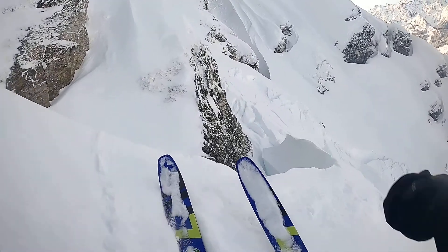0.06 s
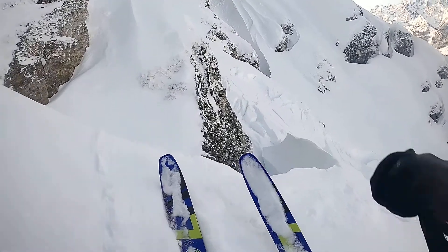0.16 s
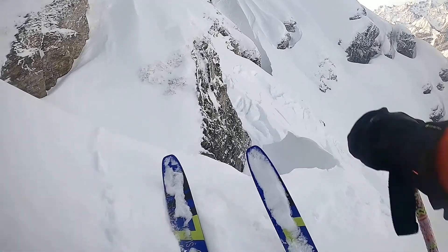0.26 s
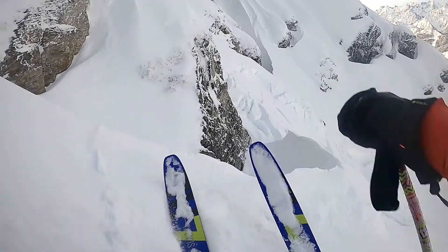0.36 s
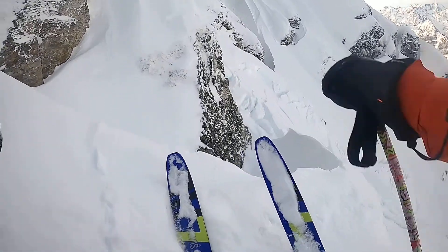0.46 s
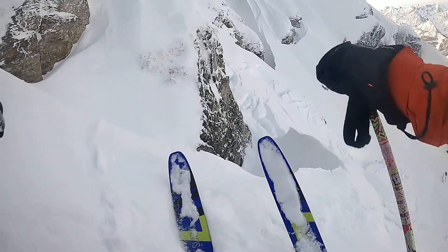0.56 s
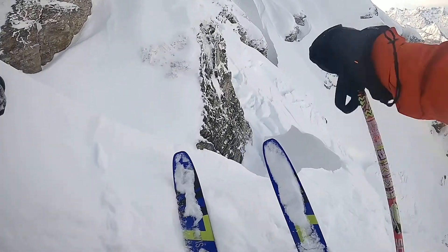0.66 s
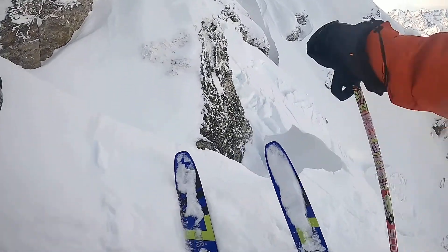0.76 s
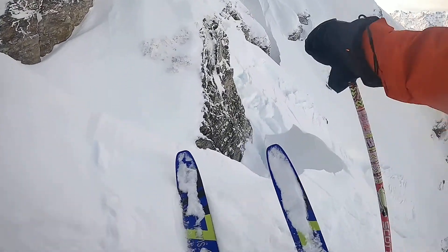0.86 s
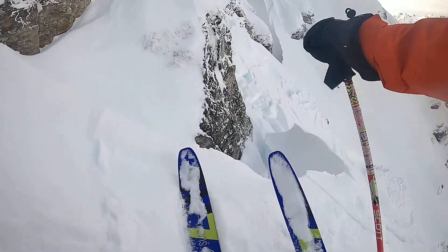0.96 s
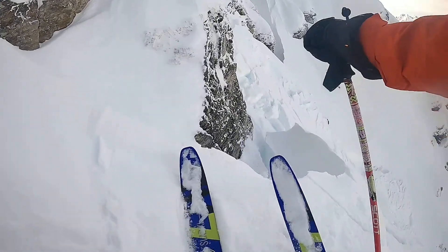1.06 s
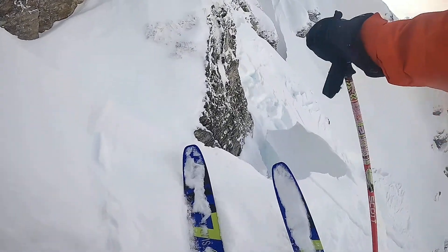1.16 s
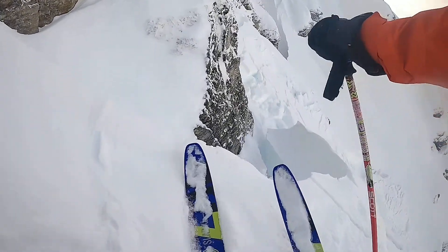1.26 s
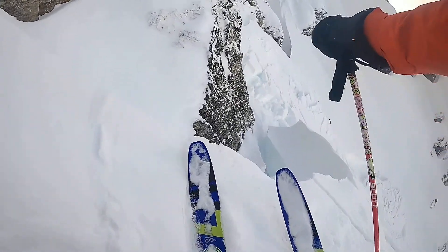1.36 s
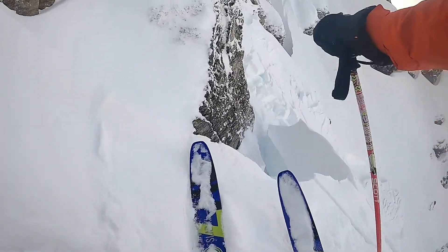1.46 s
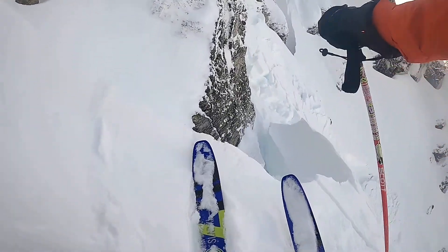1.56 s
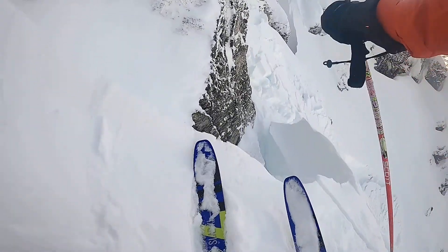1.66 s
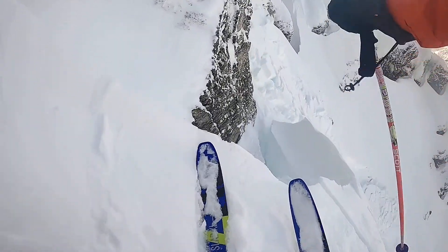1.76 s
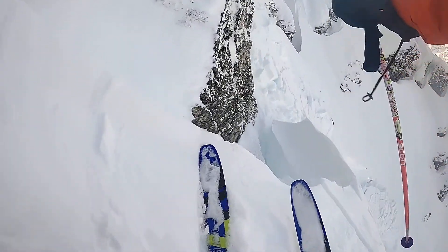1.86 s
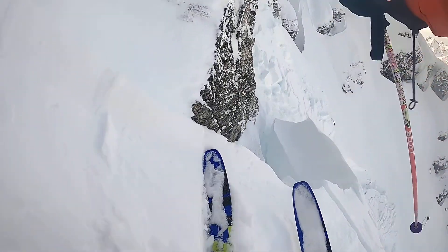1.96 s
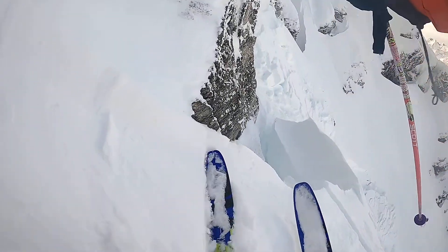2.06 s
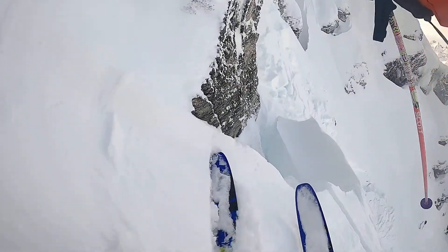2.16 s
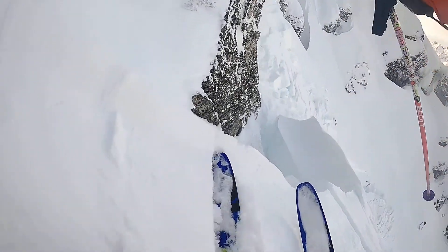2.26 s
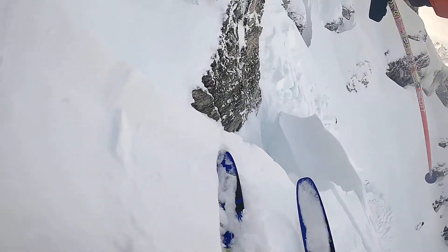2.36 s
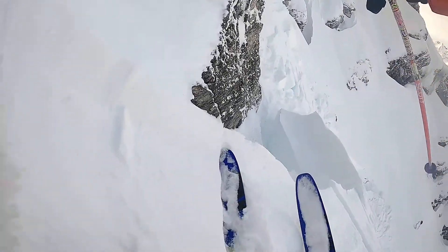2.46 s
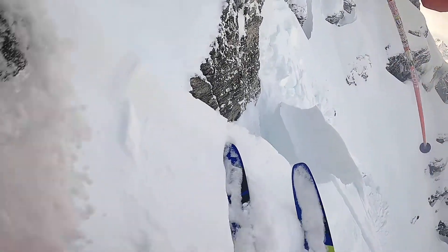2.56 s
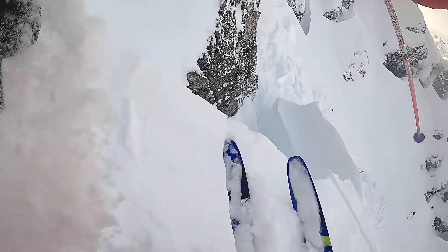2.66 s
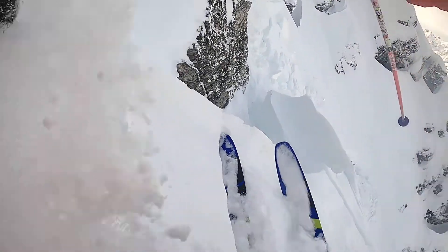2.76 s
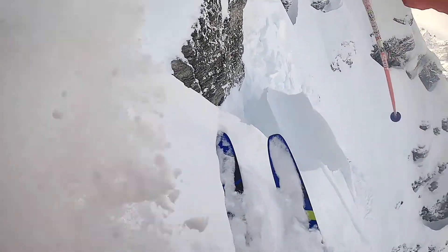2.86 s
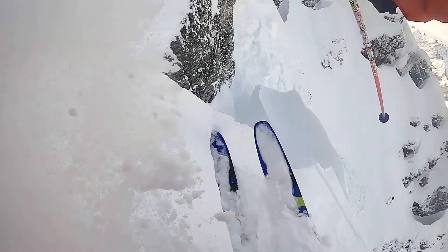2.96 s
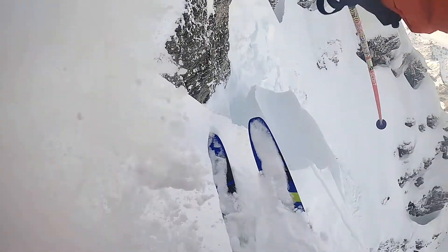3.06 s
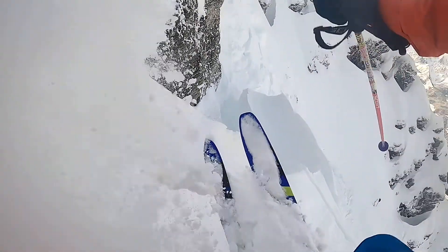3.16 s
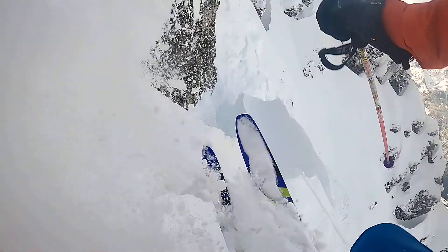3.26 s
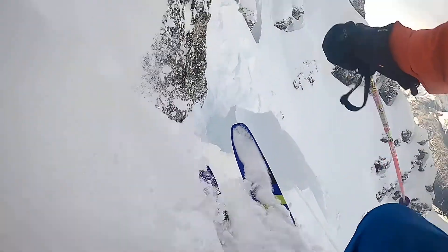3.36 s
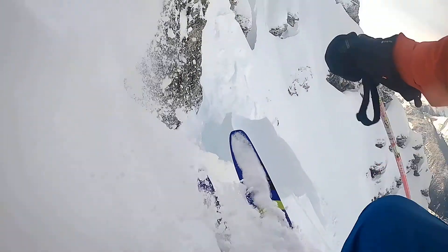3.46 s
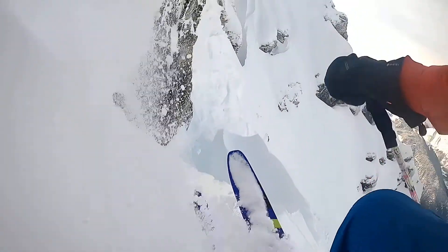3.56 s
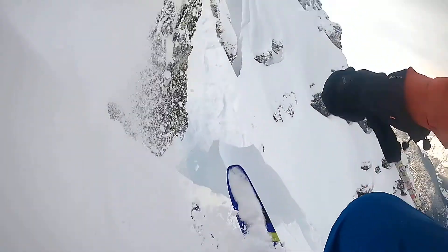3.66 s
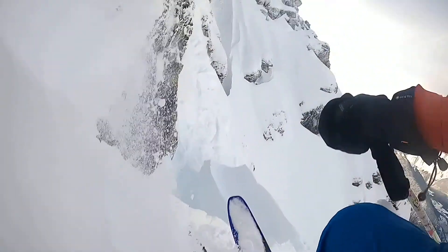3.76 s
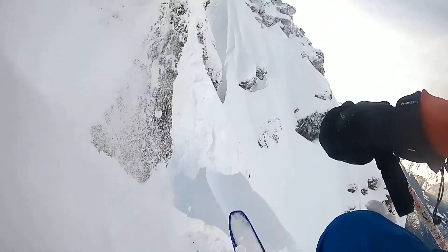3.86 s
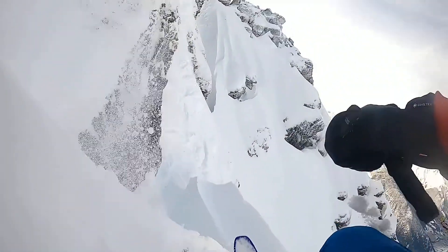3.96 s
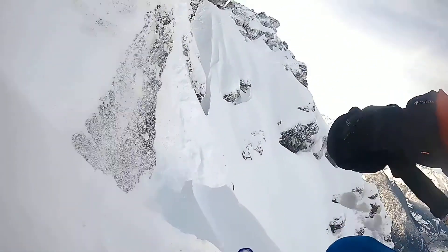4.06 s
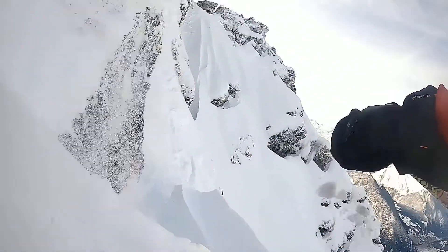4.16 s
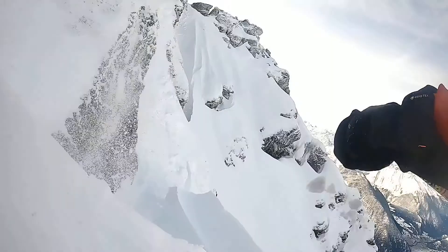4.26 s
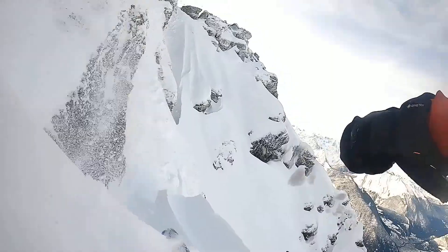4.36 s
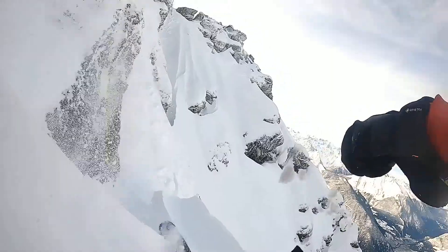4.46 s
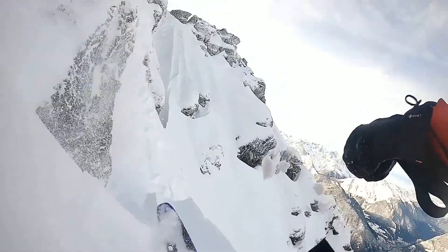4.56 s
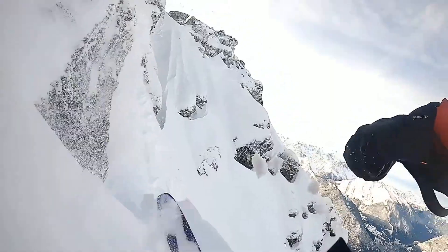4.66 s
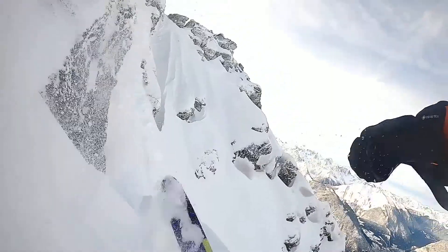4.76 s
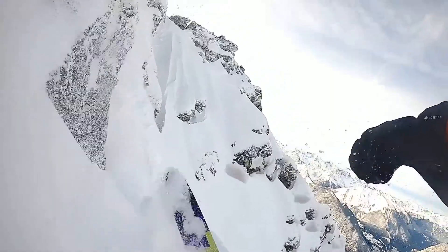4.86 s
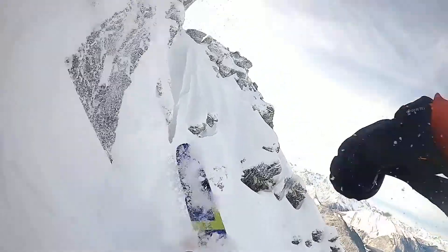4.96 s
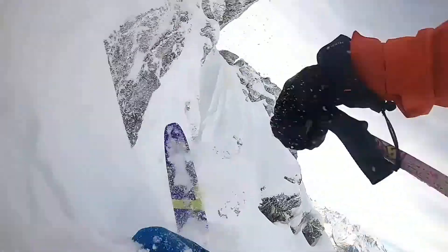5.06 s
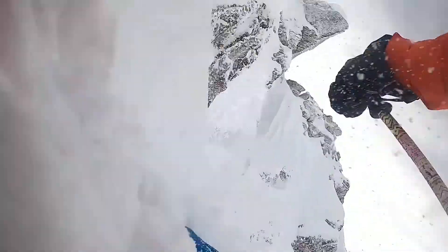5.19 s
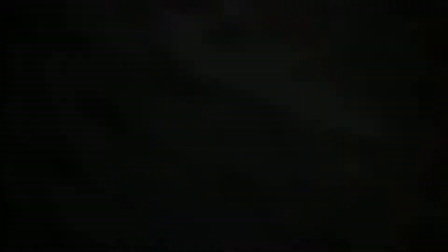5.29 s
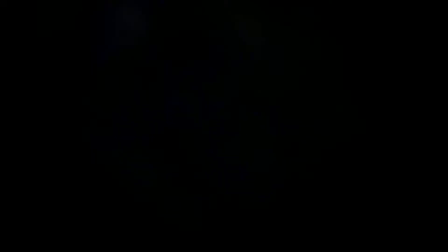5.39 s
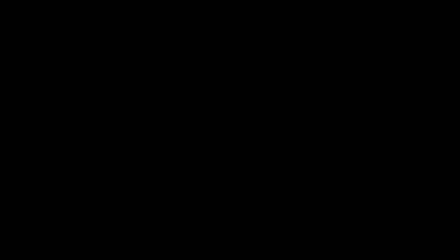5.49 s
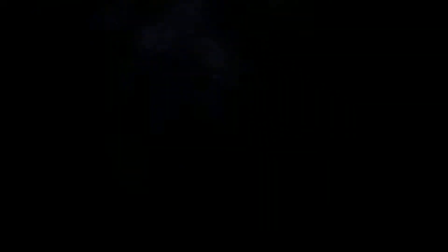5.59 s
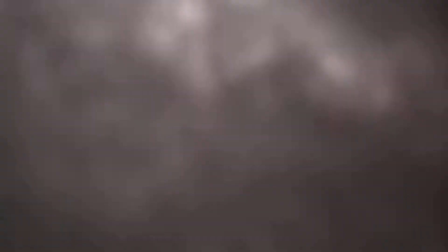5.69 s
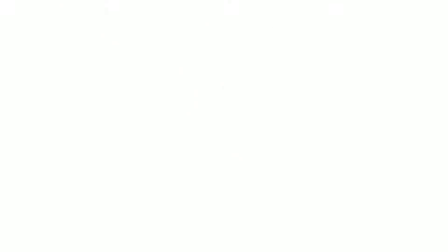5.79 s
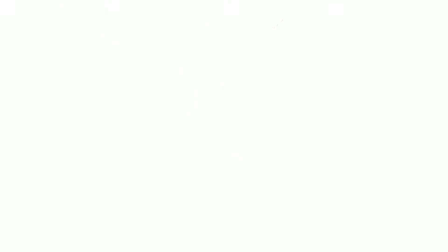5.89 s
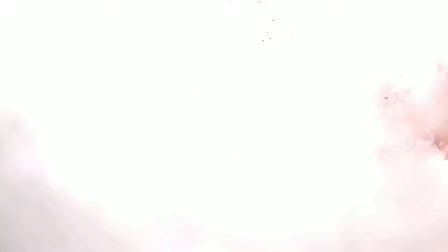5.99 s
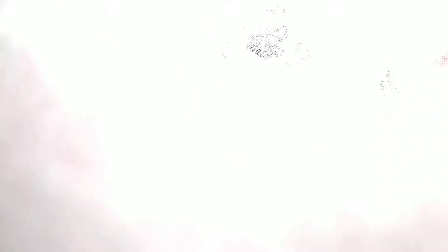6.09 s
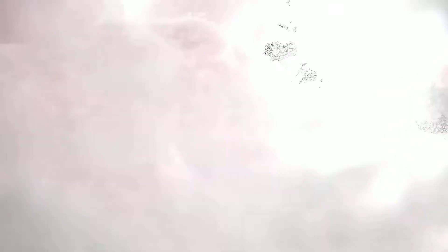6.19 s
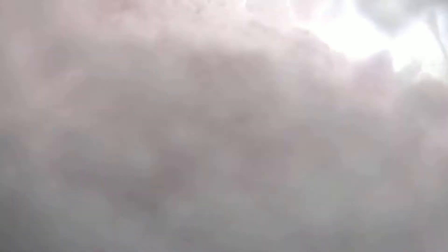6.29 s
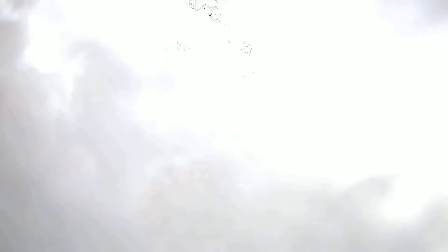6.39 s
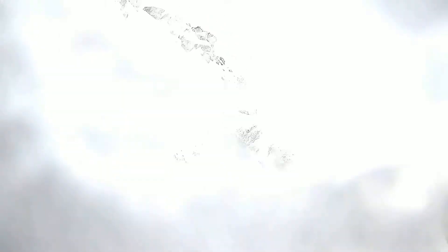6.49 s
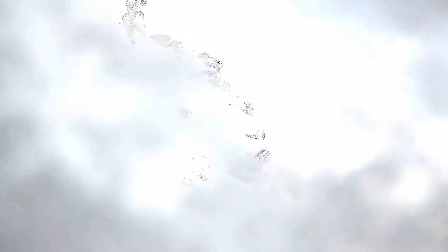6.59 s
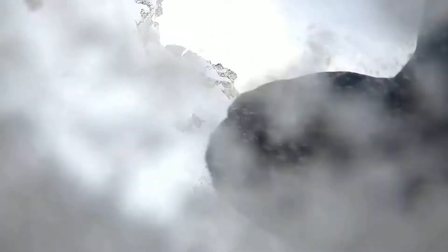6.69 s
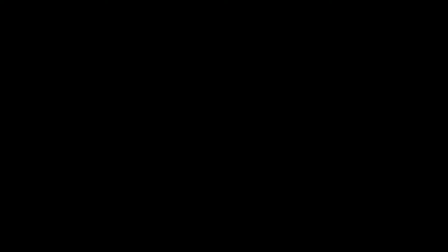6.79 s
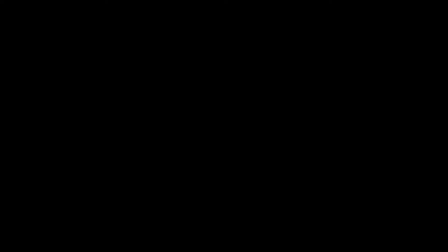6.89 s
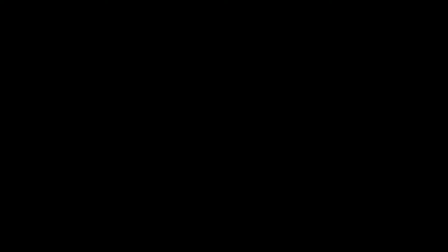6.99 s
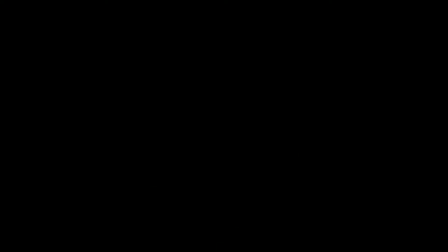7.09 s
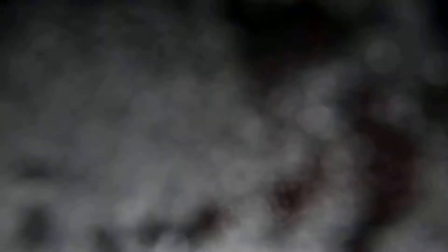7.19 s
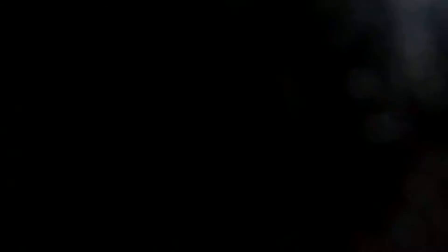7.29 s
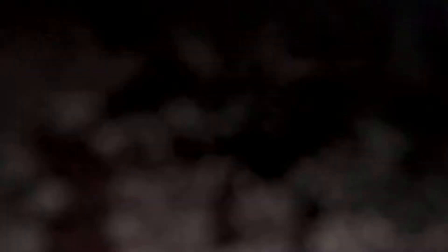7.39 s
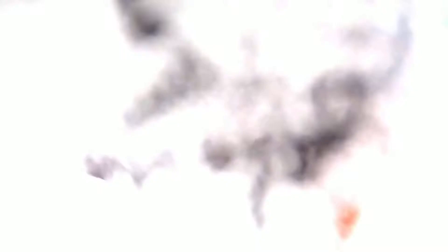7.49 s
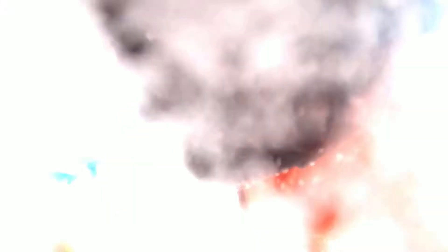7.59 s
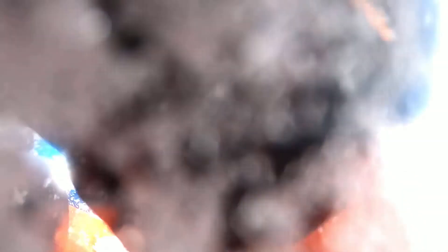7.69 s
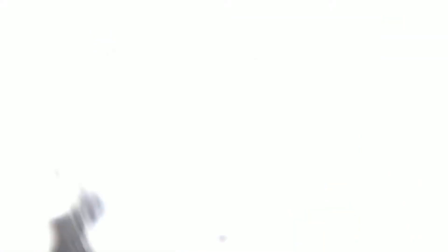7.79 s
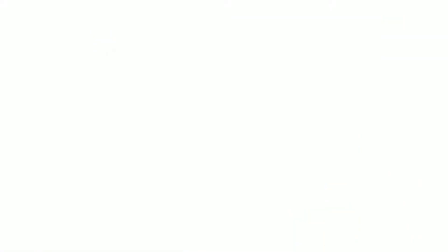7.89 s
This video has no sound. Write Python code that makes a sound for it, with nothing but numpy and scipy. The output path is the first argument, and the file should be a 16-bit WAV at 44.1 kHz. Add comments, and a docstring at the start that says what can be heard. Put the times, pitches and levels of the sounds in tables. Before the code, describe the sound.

The microphone is on a skier's body on a steep snowy slope, very close and dry. From 0 to 4.9 seconds everything is muffled: deep, wavering wind rumble, dull thuds and short rings through the mount, rubbing, and soft crunching snow. Bumps cluster around 0.4-0.9, 1.55-1.75 and 2.0-2.4, then grow strongest from 2.9 to 3.4; more thuds come near 4.0, with low scrapes around 4.2 and 4.6-4.8. At 4.9 the sound abruptly opens, bright and harsh. A sharp knock at 4.96 leads into a rush of powder hiss and coarse patter, heaviest at 5.2-5.8, with low air buffeting. From 5.9 the flow thins into spurts with scattered clods and crushing lumps. A hard, squeaky crack lands near 6.83; rapid knocks, ticks and crackles follow from 7.0, crowding at 7.4-7.6, easing briefly, then striking again at 7.84-7.94.

```python
"""Skier caught by sliding snow

A skier on a steep slope is overrun by sliding snow, heard from a camera worn on the body.
At first the microphone is muffled: filtered noise makes windy rumble, dull crunching and scrapes,
and jolts through the mount are short falling thuds and rings.
Then it opens up: dense random grains hiss and patter as powder, low noise buffets the port,
and clods, lumps and ice strike the housing as short rings, cracks, squeaks and ticks."""
import sys
import numpy as np
from scipy import signal
from scipy.fft import rfft, irfft, next_fast_len
from scipy.io import wavfile
from scipy.ndimage import uniform_filter1d, minimum_filter1d

SR = 44100
rng = np.random.default_rng(int(sys.argv[2]) if len(sys.argv) > 2 else 0)


def put_to_file(sound):
    """Save the sound as 16-bit audio at rate SR, in the file named by the first command-line argument."""
    columns = np.atleast_2d(sound).T  # one column per channel
    safe = np.clip(columns, -1, 1)
    whole_steps = np.round(safe * 32767)
    wavfile.write(sys.argv[1], SR, whole_steps.astype(np.int16))


N = 350154
TIME = np.arange(N) / SR


def amp(db):
    """Turn decibels into a gain."""
    return 10 ** (np.asarray(db) / 20)


def unit(x):
    """Scale a sound to an rms of 1."""
    return x / np.sqrt(np.mean(x ** 2))


def curve(table):
    """Draw a table of (time, value) as straight lines through time."""
    return np.interp(TIME, *np.transpose(table))


def noise():
    """White noise."""
    return rng.standard_normal(N)


def walk(rate):
    """Smooth random wandering with spread 1; rate is in new values per second."""
    hold = int(SR / rate)
    steps = np.repeat(rng.standard_normal(N // hold + 1), hold)
    return unit(uniform_filter1d(steps, hold)[:N])


def grains(rate, spread_db):
    """Tiny impacts at random moments, rate per second, with random sizes and an rms of 1."""
    size = amp(spread_db * np.minimum(rng.exponential(size=N), 5))
    present = rng.random(N) < rate / SR
    return unit(present * size * rng.choice([-1, 1], N))


def colour(x, spectrum):
    """Filter a sound to a spectrum shape without any sound before its cause; white noise keeps its power."""
    size = next_fast_len(len(x) + 4096)
    hz, db = np.transpose(spectrum)
    bins = np.maximum(np.fft.rfftfreq(size, 1 / SR), 1)
    gain = unit(amp(np.interp(np.log(bins), np.log(hz), db)))
    # folding the cepstrum makes the filter respond as early as it can
    cepstrum = irfft(np.log(gain), size)
    cepstrum[1:size // 2] *= 2
    cepstrum[size // 2 + 1:] = 0
    response = np.exp(rfft(cepstrum))
    return irfft(rfft(x, size) * response, size)[:len(x)]


def resonate(x, hz, q):
    """Let through a band around one pitch, with gain 1 at its centre."""
    b, a = signal.iirpeak(hz, q, fs=SR)
    return signal.lfilter(b, a, x)


def add(track, s, sound):
    """Mix a sound into a track at time s."""
    start = max(int(s * SR), 0)
    part = sound[:N - start]
    track[start:start + len(part)] += part


def burst(t, rise, fall):
    """Envelope that grows and dies away, peak 1."""
    shape = (1 - np.exp(-t / rise)) * np.exp(-t / fall)
    return shape / shape.max()


def swell(t, rise, fall):
    """Envelope that grows towards t = 0 and dies away after it."""
    return np.exp(np.minimum(t / rise, -t / fall))


def ring(t, modes, centre_hz, focus_db=9, scatter_db=1.5, detune=.06):
    """Struck tones, peak 1; the blow favours those near its own pitch, and packed snow detunes them."""
    hz, t60, db = np.transpose(modes)[:, :, None]
    weight, shift = rng.standard_normal((2, len(modes), 1))
    sign = rng.choice([-1, 1], (len(modes), 1))
    octaves_away = np.abs(np.log2(hz / centre_hz))
    db = db - focus_db * octaves_away + scatter_db * weight
    tones = np.sin(2 * np.pi * hz * (1 + detune * shift) * t)
    sound = np.sum(sign * amp(db - 60 * t / t60) * tones, axis=0)
    return sound / np.abs(sound).max()


# Snow streaming over the camera: start_s, flow_db (0 at the height of the slide)
SNOW_FLOW = [(5.02, -33.5), (5.12, -22), (5.16, -15.5), (5.21, -17.5), (5.25, -10.5), (5.29, -11),
             (5.335, -17), (5.395, 0), (5.5, -3.5), (5.57, -9.5), (5.74, -6.5), (5.87, -23), (5.94, -23),
             (6.04, -17), (6.11, -23), (6.22, -27), (6.32, -19.5), (6.53, -22.5), (6.67, -33.5),
             (6.75, -21), (6.86, -33), (6.95, -24), (7.04, -18.5), (7.1, -20), (7.15, -19.5), (7.21, -31),
             (7.285, -16.5), (7.345, -30.5), (7.41, -26), (7.53, -13.5), (7.64, -33.5), (7.77, -32.5),
             (7.81, -33), (7.85, -30), (7.94, -15)]
# Eddies of air that hit the port: peak_s, rise_s, fall_s, level_db
AIR_GUSTS = [(4.98, 0.05, 0.054, -21), (5.49, .04, .02, -22), (5.796, 0.015, 0.062, -10.5),
             (5.983, 0.015, 0.062, -13.5), (6.28, 0.057, 0.016, -18.5), (6.583, 0.035, 0.013, -8.5),
             (6.838, 0.02, .01, -7.5), (7.008, 0.013, 0.046, -15), (7.251, 0.008, 0.02, -15),
             (7.379, 0.013, 0.04, -14.5), (7.519, 0.021, 0.012, -9.5), (7.6, 0.005, 0.005, -7),
             (7.864, 0.014, 0.065, -11)]
# Tone of coarse snow, only the shape counts: pitch_hz, level_db (per Hz)
COARSE_TONE = [(120, -11.5), (300, 2.5), (550, 0.5), (740, -2.5), (1000, 1), (1350, 1), (1700, -4.5),
               (2100, -22), (3000, -40.5), (6000, -57)]
# Tone of fine powder, only the shape counts: pitch_hz, level_db (per Hz)
POWDER_TONE = [(1200, 3), (2100, 0.5), (2700, 1.5), (3400, 2.5), (4300, -2), (5300, -7.5), (6000, -17.5),
               (7200, -21.5), (8200, -34), (10000, -29), (11300, -34), (13000, -34), (15500, -65.5)]
# Tone of air buffeting the port, only the shape counts: pitch_hz, level_db (per Hz)
BUFFET_TONE = [(12, -21), (30, -2), (55, 1), (95, -2.5), (150, -9.5), (250, -14), (400, -23), (700, -32.5),
               (2000, -80), (8000, -100)]
COARSE_DB, POWDER_DB, BUFFET_DB = -20.5, -27.5, -13  # at 0 dB flow, before surges, cloud and gusts
BUFFET_SLOPE = 0.62  # dB of buffeting per dB of flow
CLOUD_DB, CLOUD_FLOW_DB = 8, 0  # most extra powder whirled up, and the flow that whirls up half of it (dB)


def spray(even_db=-4, patter_surge_db=2.5, hiss_surge_db=1.5, patter_slope=1.03):
    """The flow drives it all: coarse snow patters, fine powder hisses on the housing, air buffets the port."""
    flow_db = curve(SNOW_FLOW)
    # a thin spray comes in spurts, a thick one pours more evenly
    surge = walk(rate=59) / (1 + amp(flow_db - even_db))
    cloud_db = CLOUD_DB / (1 + amp(CLOUD_FLOW_DB - flow_db))
    coarse_db = COARSE_DB + patter_slope * flow_db + patter_surge_db * surge
    powder_db = POWDER_DB + flow_db + hiss_surge_db * surge + cloud_db
    patter = colour(amp(coarse_db) * grains(rate=2000, spread_db=2.5), COARSE_TONE)
    hiss = colour(amp(powder_db) * grains(rate=13000, spread_db=3.0), POWDER_TONE)
    air = amp(BUFFET_DB + BUFFET_SLOPE * flow_db)
    for s, rise, fall, db in AIR_GUSTS:
        air = np.hypot(air, amp(db) * swell(TIME - s, rise, fall))
    return patter + hiss + colour(noise(), BUFFET_TONE) * air


# Clods striking the housing: start_s, knock_db, crack_db, thump_db, knock_pitch_hz (where it settles),
# knock_fall_s, crack_pitch_hz (the ringing tones near it are favoured), thump_pitch_hz
CLOD_HITS = [(4.91, -27, -46, -30, 1140, 0.0017, 3000, 104),
             (4.964, -5.5, -19, -21, 1232, 0.0018, 3370, 200),
             (5.2, -12, -28.5, -14, 635, 0.00063, 2500, 223),
             (5.302, -5.5, -39, -5, 1070, 0.0035, 2700, 232),
             (5.502, -9.5, -35, -1.5, 1090, 0.004, 3000, 108),
             (5.762, -10, -16, -11, 1276, 0.0024, 2600, 178),
             (5.8, -12, -25.5, -7.5, 980, 0.0024, 2700, 174),
             (6.063, -15.5, -31, -11, 1220, 0.00086, 2990, 202),
             (6.438, -21.5, -29.5, -10.5, 985, .002, 3000, 151),
             (6.483, -19.5, -35, -25, 489, 0.0017, 3000, 120), (6.557, -7, -19, -8, 900, 0.0014, 3080, 170),
             (6.576, -21, -24.5, -5, 505, 0.0018, 3500, 104.5),
             (6.754, -15, -20, -37, 1000, 0.0019, 2580, 250),
             (6.757, -39, -46, -4.5, 400, 0.0018, 2600, 164),
             (6.827, 2.5, -11, -10, 816, 0.0016, 3040, 338), (6.833, -4, -12, -4.5, 640, 0.0015, 3700, 107),
             (6.85, -26, -42, -12, 500, 0.0013, 3470, 89), (6.876, -25, -35, -26, 690, 0.0013, 3000, 200),
             (6.974, -21, -16.5, -18, 1450, 0.0012, 3630, 105),
             (6.984, -14.5, -27, -19, 1210, 0.00073, 3500, 105),
             (7.004, -19, -38, -20, 468, 0.0029, 3000, 138),
             (7.047, -14.5, -30, -17, 950, 0.0016, 3000, 200),
             (7.074, -23, -29, -33, 1320, .0015, 3000, 150), (7.123, -17, -33, -27, 850, 0.0015, 3000, 150),
             (7.169, -10.5, -29.5, -13, 706, 0.00061, 3000, 200),
             (7.19, -19.5, -51, -14, 595, 0.0033, 3000, 200),
             (7.208, -16.5, -40, -23, 1000, 0.0014, 2800, 200),
             (7.225, -14, -44, -35, 1110, 0.0016, 3000, 150),
             (7.249, -20, -21, -14, 604, 0.00099, 3100, 128),
             (7.397, -18.5, -36, -16, 695, 0.0016, 3000, 104),
             (7.444, -9, -44, -17, 1290, 0.0015, 3200, 200), (7.473, -21, -36, -21, 604, 0.0027, 3000, 200),
             (7.491, -22, -30, -21, 564, 0.0024, 3000, 202), (7.514, -14, -47, -11, 505, 0.0029, 3000, 110),
             (7.528, -7.5, -35, -14, 596, 0.0012, 3200, 230), (7.547, -7.5, -33, -24, 876, .004, 3600, 350),
             (7.555, -12.5, -5.5, -10, 1140, 0.0014, 3430, 106),
             (7.589, -10, -8, -14, 1210, 0.0018, 3480, 150),
             (7.603, -9.5, -17, -6, 1230, 0.00085, 3220, 222),
             (7.838, -16, -23, -10, 920, 0.0011, 3270, 105),
             (7.867, -17.5, -16.5, -18, 884, 0.0021, 2970, 101),
             (7.883, -5, -17, -13, 575, 0.00053, 3730, 130), (7.891, -14, -27, -18, 830, 0.0015, 3200, 201),
             (7.913, -7.5, -20.5, -20, 1074, 0.0014, 2770, 170)]
# Ringing of the housing, before detuning: pitch_hz, fade_s (time to fall 60 dB), level_db (relative)
HOUSING_RING = [(485, 0.013, 3.5), (915, 0.017, -11), (1010, 0.015, -3.5), (1228, 0.022, -7),
                (1420, 0.011, -11.5), (2000, 0.022, -20.5)]
# Bright ringing of the port cover, before detuning: pitch_hz, fade_s (to fall 60 dB), level_db (relative)
COVER_RING = [(2696, 0.024, 0.5), (3263, 0.015, -3), (3580, 0.014, -5.5), (3980, 0.016, -20.5)]
DULL_LEAD_DB = -21  # dull noise leading into the hit, against the knock
BRIGHT_LEAD_DB, SNAP_DB = -14.5, -12  # bright noise leading into the hit, and the snap, against the crack


def clods(housing_db=-3.0, contact_s=0.00059, lead_s=0.0025, sag=0.093):
    """A clod rings trapped air and the housing, cracks on the port cover and thumps air into the port."""
    t = TIME[:SR // 8]
    contact = 1 - np.exp(-(t / contact_s) ** 2)  # snow yields before it pushes
    lead_in = np.exp((t - t[-1]) / lead_s)  # a short noise swell leading into the knock
    rings, bright_noise, dull_noise = np.zeros((3, N))
    for s, knock_db, crack_db, thump_db, knock_hz, fall, crack_hz, thump_hz in CLOD_HITS:
        # the pitch of the trapped air sags as the pressure lets go
        turns = np.cumsum(knock_hz * (1 + sag * np.exp(-t / fall))) / SR
        pocket = np.exp(-t / fall) * np.sin(2 * np.pi * turns)
        knock = contact * (pocket + amp(housing_db) * ring(t, HOUSING_RING, knock_hz))
        cycles = thump_hz * t
        thump = contact * burst(cycles, 0.25, 0.42) * np.sin(2 * np.pi * cycles)
        add(dull_noise, s - t[-1], amp(knock_db + DULL_LEAD_DB) * lead_in)
        add(bright_noise, s - t[-1], amp(crack_db + BRIGHT_LEAD_DB) * lead_in)
        add(rings, s, amp(knock_db) * knock / np.abs(knock).max())
        add(rings, s, amp(crack_db) * contact * ring(t, COVER_RING, crack_hz, focus_db=27.5))
        add(rings, s, amp(thump_db) * thump)
        add(bright_noise, s, amp(crack_db + SNAP_DB) * burst(t, 0.00012, 0.00096))
    return rings + colour(bright_noise * noise(), POWDER_TONE) + colour(dull_noise * noise(), COARSE_TONE)


# Loose lumps that crush against the housing: peak_s, rise_s, fall_s, coarse_db, powder_db (both before
# the rings are added), low_ring_hz, high_ring_hz
LUMP_SPLATS = [(4.913, 0.00082, 0.062, -44, -53, 1200, 3300),
               (4.963, 0.011, 0.0039, -22, -40.5, 1350, 3500),
               (5.302, 0.0021, 0.0038, -31, -35, 1020, 2970), (5.767, 0.0018, 0.021, -27, -38, 1095, 2690),
               (5.802, 0.0021, 0.018, -30, -54, 1190, 2700), (5.969, 0.01, 0.006, -30.5, -41, 1100, 2660),
               (6.259, .003, 0.0057, -28, -43, 905, 2750), (6.286, 0.0014, 0.0098, -32, -21, 1520, 4260),
               (6.298, 0.007, .011, -24, -29.5, 1450, 2980), (6.335, 0.0075, 0.016, -35, -36.5, 1510, 3830),
               (6.578, 0.03, 0.02, -34, -40.5, 935, 3520), (6.758, 0.0015, 0.004, -31, -48, 1120, 2900),
               (6.818, .007, 0.0069, -20.5, -25, 1390, 3220),
               (6.835, 0.0025, 0.0014, -12.5, -25, 1460, 3900),
               (6.897, 0.0042, 0.004, -25.5, -42.5, 1154, 2680),
               (7.023, 0.016, 0.012, -23.5, -31.5, 1400, 3080), (7.059, 0.0092, 0.022, -28, -50, 793, 3100),
               (7.2, 0.0055, 0.0022, -22, -44.5, 1220, 2760),
               (7.246, 0.0061, 0.0037, -21.5, -40, 1250, 2780),
               (7.283, 0.0025, 0.0028, -28, -51, 1050, 3000), (7.375, 0.011, 0.0071, -33, -40, 1410, 4930),
               (7.445, 0.0035, 0.0022, -15, -40, 1250, 3200), (7.495, 0.022, 0.012, -25, -47, 1130, 3500),
               (7.551, 0.012, 0.005, -14, -33, 950, 3600), (7.562, 0.0036, 0.0048, -19.5, -32, 1190, 3400),
               (7.593, 0.011, 0.005, -31, -28.5, 1320, 3800), (7.621, 0.01, 0.0044, -33, -46, 1410, 4200),
               (7.789, 0.026, 0.0041, -41.5, -47.5, 1210, 2830),
               (7.872, 0.012, 0.012, -17, -31.5, 1170, 3170)]


def splats(low_q=9, high_q=16):
    """A lump packs ever harder on the housing and breaks; trapped air pockets ring at their own pitches."""
    t = TIME[:SR // 2]
    middle = t.mean()
    coarse_grains = grains(rate=1900, spread_db=1.5)
    fine_grains = grains(rate=6000, spread_db=3.5)
    out = np.zeros(N)
    for s, rise, fall, coarse_db, powder_db, low_hz, high_hz in LUMP_SPLATS:
        pressure = swell(t - middle, rise, fall)
        coarse = colour(pressure * rng.choice(coarse_grains, len(t)), COARSE_TONE)
        powder = colour(pressure * rng.choice(fine_grains, len(t)), POWDER_TONE)
        add(out, s - middle, amp(coarse_db) * (coarse + 0.83 * resonate(coarse, low_hz, low_q)))
        add(out, s - middle, amp(powder_db) * (powder + 1.76 * resonate(powder, high_hz, high_q)))
    return out


PELLET_RATE, PELLET_DB = 65, -31  # pellets per second; level of their dull part at 0 dB flow


def pellets(bright_db=-11):
    """Small hard pellets in the flow tick on the housing at random, each with a dull and a bright part."""
    ticks = grains(rate=PELLET_RATE, spread_db=2.0) * amp(PELLET_DB + curve(SNOW_FLOW))
    return colour(ticks, COARSE_TONE) + amp(bright_db) * colour(ticks, POWDER_TONE)


def snow_cover(x, depth_db, rate, count):
    """Snow settles on the port and slips off again: the level of each band of sound wanders on its own."""
    size = next_fast_len(N)
    spectrum, hz = rfft(x, size), np.fft.rfftfreq(size, 1 / SR)
    centres = np.geomspace(400, 8000, count)
    out = np.zeros(N)
    for share in np.eye(count):
        # overlapping bands that add up to the whole sound
        band = irfft(spectrum * np.interp(hz, centres, share), size)[:N]
        out += band * amp(depth_db * walk(rate))
    return out


# Hard grains of ice ticking on the housing, and a faint bright ping at 5.117 s: start_s, level_db (of the hit
# before it is coloured)
ICE_HITS = [(5.117, -26), (5.247, -12), (6.287, -9), (6.291, -9), (6.833, -3), (6.852, -30), (6.975, -8),
            (6.982, -17), (7.17, -29), (7.253, -21), (7.399, -21), (7.428, -19), (7.555, 2), (7.59, -8.5)]
# Tone of such a tick, only the shape counts: pitch_hz, level_db (per Hz)
ICE_TONE = [(800, -6.5), (2500, 9.5), (5200, -2.5), (7500, -19.5), (13000, -27), (16000, -26)]


def ice():
    """Each hit gives one dry, bright tick."""
    hits = np.zeros(N)
    for s, db in ICE_HITS:
        hits[int(s * SR)] += amp(db)
    return colour(hits, ICE_TONE)


# Packed snow squeaking on the housing: peak_s, rise_s, fall_s, level_db, pitch_hz (both before wavering)
SNOW_SQUEAKS = [(4.959, 0.0031, .002, -33, 1160), (6.821, 0.0067, .003, -11.5, 1300),
                (6.821, 0.0065, 0.004, -37, 4850), (7.019, 0.0079, .006, -27, 1485),
                (7.24, 0.0046, .003, -22, 1100), (7.548, 0.0098, 0.006, -29, 3720),
                (7.553, 0.013, 0.01, -26, 1930), (7.585, 0.0074, .006, -37, 3710),
                (7.618, .014, .006, -36.5, 4270), (7.625, .007, .005, -24, 1380)]


def squeaks(waver=0.04, rough_db=1.5, glide=0.06):
    """Packed snow sticks and slips on the housing: a rough chirp that drops as it lets go."""
    out = np.zeros(N)
    unsteady = np.exp(waver * walk(rate=600))
    rough = amp(rough_db * walk(rate=500))
    for s, rise, fall, db, hz in SNOW_SQUEAKS:
        pitch = hz * unsteady * (1 - glide * np.tanh((TIME - s) / rise))
        chirp = np.sin(2 * np.pi * np.cumsum(pitch) / SR)
        out += amp(db) * swell(TIME - s, rise, fall) * rough * chirp
    return out


# The skier shifts weight or swings an arm: peak_s, half_length_s, effort_db
BODY_SHIFTS = [(0.47, 0.062, -1), (0.788, 0.059, 2.5), (0.974, 0.11, -4.5), (1.334, 0.17, -8.5),
               (1.674, 0.068, 2.5), (2.04, 0.058, 0), (2.415, 0.13, -5), (2.935, 0.06, -1.5),
               (3.118, 0.061, 3.5), (3.33, 0.077, 2), (3.584, 0.071, -4.5), (3.781, 0.072, -2),
               (4.04, 0.092, -3), (4.83, 0.049, -12)]
# Snow sliding around the skis while muffled: start_s, level_db (before the gain SLIDE_DB)
SKI_SLIDE = [(0.3, -64.5), (0.55, -56), (0.8, -48), (1.08, -49.5), (1.23, -58), (1.6, -52.5), (1.88, -62.5),
             (2.08, -53.5), (2.25, -63.5), (2.78, -60), (3.12, -48), (3.78, -44.5), (3.88, -51),
             (4.18, -50), (4.42, -60), (4.69, -59.5), (4.8, -50), (4.9, -58)]
# Tone of the wind, only the shape counts: pitch_hz, level_db (per Hz)
WIND_TONE = [(10, -24.5), (22, 14), (34, -15), (50, -12), (80, -16.5), (140, -20), (250, -42), (600, -68.5),
             (3000, -110)]
# Tone of the rubbing mount, only the shape counts: pitch_hz, level_db (per Hz)
RUB_TONE = [(70, -19), (120, -1.5), (200, 4), (280, 8), (370, 4), (480, -11.5), (800, -32.5), (3000, -83)]
# Tone of snow through the muffled microphone, only the shape counts: pitch_hz, level_db (per Hz)
MUFFLED_TONE = [(250, 5.5), (420, 3.5), (530, -9), (660, 5), (730, -5.5), (830, 3), (1050, -5.5),
                (1350, -9.5), (1500, -21.5), (1750, -23), (2000, -40), (2600, -45.5), (3600, -53.5),
                (8000, -88)]
REST_DB, FIDGET_DB = -11.5, 0.5  # effort between the shifts, and how much it wanders
WIND_DB, RUB_DB, CRUNCH_DB = -14, -40, -46  # wind, mount and trodden snow at 0 dB effort
SLIDE_DB = 5.5  # gain of the sliding snow


def slope(wind_power=0.97, rub_power=0.88):
    """Each body shift stirs air, rubs the mount and treads snow; loose snow slides past. All is muffled."""
    effort = amp(REST_DB + FIDGET_DB * walk(rate=13.0))
    for s, half_length, db in BODY_SHIFTS:
        shift = amp(db) * np.exp(-.5 * ((TIME - s) / half_length) ** 2)
        effort = np.maximum(effort, shift)
    wind = colour(noise(), WIND_TONE) * amp(WIND_DB) * effort ** wind_power
    rub = colour(grains(rate=1000, spread_db=2.5), RUB_TONE) * amp(RUB_DB) * effort ** rub_power
    moving_snow = np.hypot(amp(curve(SKI_SLIDE) + SLIDE_DB), amp(CRUNCH_DB) * effort ** 2)
    uneven = amp(2.9 * walk(rate=23))
    snow = colour(grains(rate=1300, spread_db=-0.5), MUFFLED_TONE) * moving_snow * uneven
    return wind + rub + snow


# Jolts through the mount: start_s, mount_ring_db, thud_db, body_drone_db
MOUNT_JOLTS = [(0.403, -33, -21, -35), (0.446, -38, -11, -39.5), (0.511, -37.5, -16.5, -31),
               (0.631, -46.5, -25, -31), (0.765, -23, -19, -37), (0.843, -35, -25, -30),
               (0.929, -32.5, -22, -31), (1.149, -32, -40.5, -42.5), (1.549, -35.5, -25.5, -37.5),
               (1.652, -33, -15.5, -27.5), (1.691, -27, -13, -37), (1.743, -44, -13.5, -40.5),
               (2.033, -34.5, -38, -36), (2.074, -41, -24.5, -26), (2.318, -47.5, -19, -31.5),
               (2.83, -49.5, -32, -33), (2.936, -44, -25, -26.5), (3.063, -28, -13.5, -24),
               (3.087, -30.5, -5.5, -22.5), (3.122, -24.5, -25, -25), (3.177, -25, -41, -30.5),
               (3.206, -29, -24.5, -27.5), (3.359, -18, -9, -16.5), (3.461, -32.5, -22.5, -33),
               (3.578, -26, -46, -38), (3.93, -28.5, -10, -24), (3.956, -32, -19.5, -34),
               (4.019, -36.5, -9.5, -28), (4.034, -46.5, -12, -28), (4.592, -52.5, -41, -22.5),
               (4.751, -37, -33, -22)]
# Ringing of the camera body on its mount, before detuning: pitch_hz, fade_s (to fall 60 dB), level_db
MOUNT_RING = [(390, 0.078, -1), (650, 0.065, 2), (835, 0.01, -2)]
SHAKE_DB, CRUMBLE_DB = -3, -10.5  # rattle of the mount against the drone; crunching snow against the ring
TICK_DB = -5.5  # first tick of a jolt against the ring


def knocks(thud_hz=40, body_hz=285, ring_hz=600):
    """Each jolt rocks the camera on its mount, shakes and rings its body and crunches some snow."""
    t = TIME[:SR // 4]
    contact = 1 - np.exp(-(t / 0.00067) ** 2)  # the padding softens every blow
    rocking, shaking, crunch = np.zeros((3, N))
    for s, ring_db, thud_db, body_db in MOUNT_JOLTS:
        thud_pitch, body_pitch = np.exp(0.12 * rng.standard_normal(2))
        # the padding is stiffest when squeezed, so the thud falls to about half its first pitch
        turns = np.cumsum(thud_hz * thud_pitch * (1 + 1.08 * np.exp(-t / 0.012))) / SR
        thud = burst(t, 0.0042, 0.029) * np.sin(2 * np.pi * turns)
        drone = burst(t, 0.0015, 0.0045) * np.sin(2 * np.pi * body_hz * body_pitch * t)
        add(rocking, s, amp(thud_db) * thud)
        add(rocking, s, amp(body_db) * drone)
        add(rocking, s, amp(ring_db) * contact * ring(t, MOUNT_RING, ring_hz))
        add(shaking, s, amp(body_db + SHAKE_DB) * burst(t, 0.0072, .014))
        add(crunch, s, amp(ring_db + CRUMBLE_DB) * burst(t, 0.0056, 0.016))
        add(crunch, s, amp(ring_db + TICK_DB) * burst(t, 0.0004, 0.0058))
    rattle = colour(shaking * noise(), RUB_TONE)
    crushed_snow = colour(crunch * grains(rate=4200, spread_db=0.5), MUFFLED_TONE)
    return rocking + rattle + crushed_snow


# Skis and gear scraping through snow: peak_s, rise_s, fall_s, level_db, pitch_hz (before wavering),
# sharpness_q (of each of two filter passes, no unit)
SKI_SCRAPES = [(0.777, 0.02, 0.023, -33, 465, 3), (3.129, 0.047, 0.08, -40, 426, 3.3),
               (3.335, 0.05, 0.017, -69.5, 2520, 8), (3.358, 0.032, 0.014, -41.5, 1113, 5.1),
               (4.188, 0.068, 0.17, -35, 270, 4.1), (4.611, 0.019, 0.021, -32, 332, 7.3),
               (4.777, 0.0066, 0.045, -32.5, 306, 4)]


def scrapes(waver=0.04):
    """Rough friction swells and fades, droning in one resonance that wavers with the pressure."""
    out = np.zeros(N)
    friction = grains(rate=1300, spread_db=2.0)
    warped = np.cumsum(np.exp(waver * walk(rate=14))) / SR  # uneven time makes the pitch waver
    for s, rise, fall, db, hz, q in SKI_SCRAPES:
        drone = unit(resonate(resonate(friction, hz, q), hz, q))
        out += amp(db) * swell(TIME - s, rise, fall) * np.interp(warped, TIME, drone)
    return out


# Slow sway of air at the port: start_s, level_db (before it wanders)
AIR_SWAY = [(0.0, -16.5), (0.93, -15.5), (1.3, -17.5), (2.2, -28), (2.95, -11.5), (3.5, -24.5),
            (4.2, -15.5), (4.88, -10.5), (5.65, -29), (5.95, -15), (7.4, -19), (7.94, -20.5)]


def heave(heave_hz=9.6, uneven_db=1.0):
    """Air sways slowly and unevenly against the port: a very low tone with wandering pitch and level."""
    phase = np.cumsum(heave_hz * np.exp(.3 * walk(rate=14))) / SR
    return amp(curve(AIR_SWAY) + uneven_db * walk(rate=18.0)) * np.sin(2 * np.pi * phase)


# Tone of the microphone hiss, only the shape counts: pitch_hz, level_db (per Hz)
HISS_TONE = [(100, 5.5), (1500, 4.5), (3000, 2.5), (6000, -6.5), (15000, -22)]


def microphone_hiss():
    """Faint, steady noise of the microphone itself."""
    return amp(-86.5) * colour(noise(), HISS_TONE)


OPEN_S = 4.909  # the moment the sound stops being muffled


def scene():
    """The muffled slope gives way abruptly to the open roar of snow, over a faint microphone hiss."""
    opened = np.clip((TIME - OPEN_S) / 0.002, 0, 1)
    muffled = slope() + knocks() + scrapes()
    pelting = snow_cover(spray() + pellets() + splats(), depth_db=2, rate=24, count=26)
    strikes = squeaks() + clods() + ice()
    mix = (1 - opened) * muffled + opened * pelting + strikes + heave() + microphone_hiss()
    return mix[None]


TOP_HZ = 15700  # upper edge of the sound


def record(dry):
    """The camera's limiter ducks the highest peaks, and the top is cut."""
    gain = np.minimum(1, .93 / (np.abs(dry) + 1e-9))
    # hold the lowest gain over 10 ms, then smooth it over 10 ms
    gain = uniform_filter1d(minimum_filter1d(gain, size=441), size=441)
    top_cut = signal.ellip(8, .2, 70, TOP_HZ, fs=SR, output="sos")
    return signal.sosfilt(top_cut, dry * gain)


dry = scene()
out = record(dry)
put_to_file(out)
```